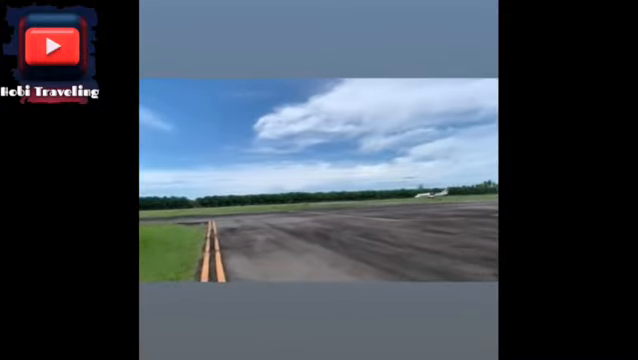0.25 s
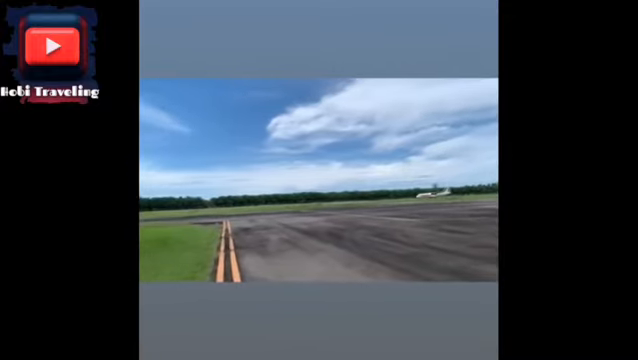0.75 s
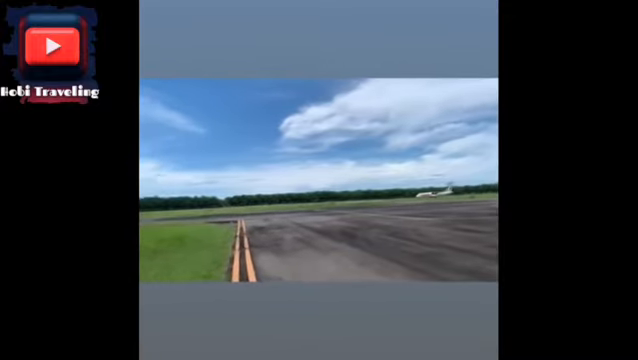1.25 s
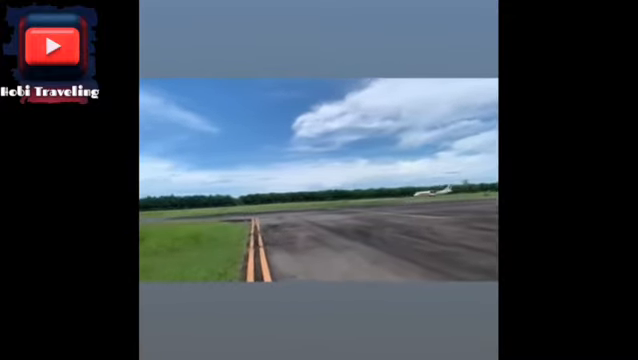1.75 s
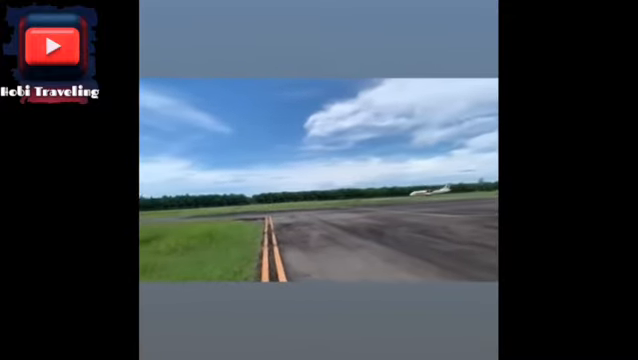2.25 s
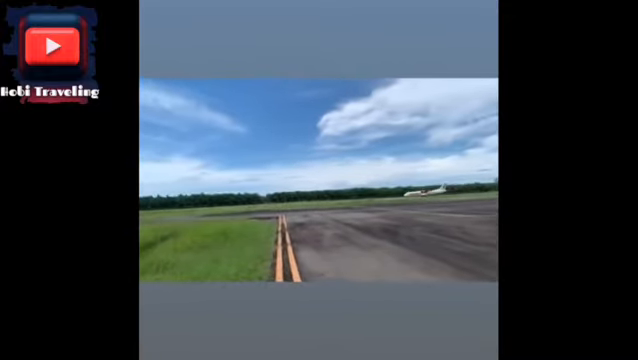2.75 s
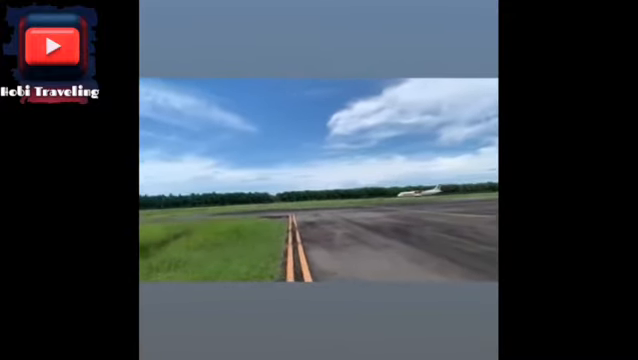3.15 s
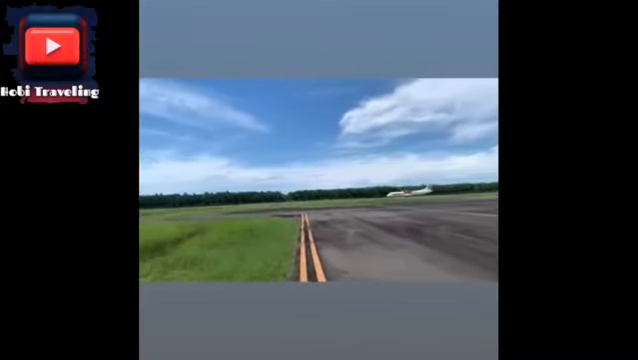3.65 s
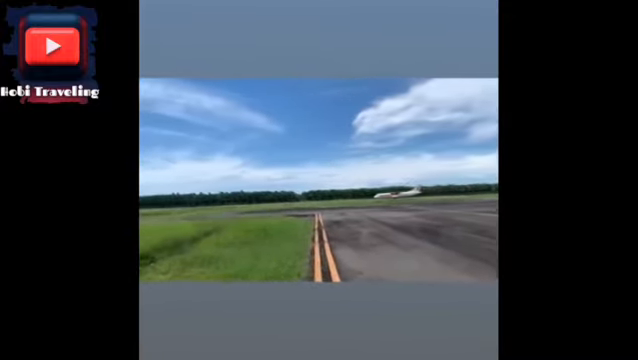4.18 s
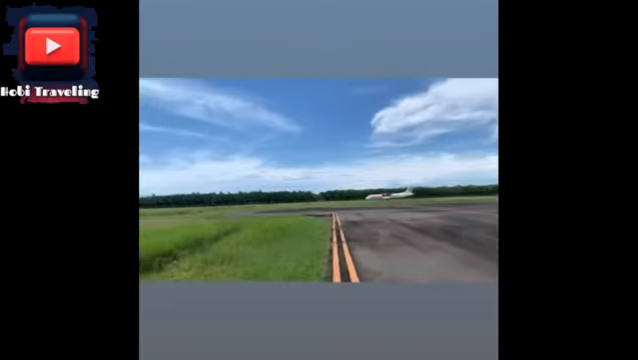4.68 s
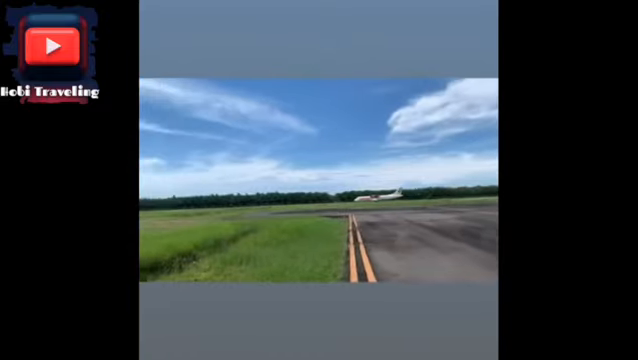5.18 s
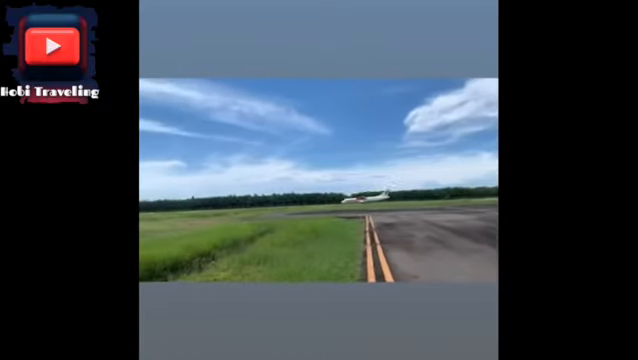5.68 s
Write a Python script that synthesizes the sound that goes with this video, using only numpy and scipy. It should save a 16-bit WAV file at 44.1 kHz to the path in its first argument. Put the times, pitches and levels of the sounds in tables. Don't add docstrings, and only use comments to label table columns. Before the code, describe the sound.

Far turboprop aircraft, continuous and gradually louder, heard by a hand-held stereo pair in an open airfield. First comes a muted low drone and rumble with breathy roar, then stronger puffs of hiss. From the middle the propeller tone becomes fuller and throbs unevenly as the two propellers drift in and out of step. The last second is brightest, with a hissy whistle, still right of centre.

```python
import sys
import numpy as np
from scipy import signal
from scipy.fft import rfft, irfft
from scipy.io import wavfile
from scipy.ndimage import uniform_filter1d, map_coordinates

SR = 44100
rng = np.random.default_rng(int(sys.argv[2]) if len(sys.argv) > 2 else 0)


def materialize(psi):
    bounded = np.clip(np.atleast_2d(psi).T, -1, 1)
    quanta = np.round(bounded * 32767).astype(np.int16)
    wavfile.write(sys.argv[1], SR, quanta)


def natural_amplitude(level_db):
    exponent = np.asarray(level_db, float) / 20
    return 10 ** exponent


N = 261072
TIME_S = np.arange(N) / SR

# t/s, length/s, gain/dB
AIR_GUSTS = [(.7, 0.1, 5), (.9, 0.073, 5), (1.13, 0.034, -2.5), (1.4, 0.14, 2), (1.56, 0.013, 2.5),
             (1.7, .07, -5), (2.28, 0.08, 7), (2.49, 0.08, 9), (2.95, 0.021, 2), (3.11, 0.076, 10.5),
             (3.33, 0.026, 4.5), (3.54, 0.02, 4.5), (3.7, 0.08, 2), (4.05, 0.21, 2), (4.27, .09, 9),
             (4.55, 0.032, 6), (4.72, 0.051, 6.5), (4.42, 0.036, 0.5), (4.93, 0.054, 2.5),
             (5.17, 0.059, 2.5), (5.31, 0.027, 6), (5.51, 0.038, 5), (5.62, 0.13, 3), (5.81, 0.055, 3.5)]
INTAKES_FACE_S, INTAKES_SWING_S = 4.76, 0.42


def rms_one(x):
    return x / np.sqrt(np.mean(x ** 2) + 1e-20)


def in_time(rows):
    s, *columns = np.transpose(rows)
    return [np.interp(TIME_S, s, c) for c in columns]


def at_hz(points, hz, axis=1):
    points = np.array(points)
    return np.interp(np.log(hz), np.log(points[:, 0]), points[:, axis])


def step(hz, from_hz, to_hz):
    return np.clip(np.log(hz / from_hz) / np.log(to_hz / from_hz), 0, 1)


def rise(at_s, over_s):
    return 0.5 + 0.5 * np.tanh((TIME_S - at_s) / over_s)


def swells(rows):
    t = np.arange(0, N, 64) / SR
    s, length, *columns = np.transpose(rows)
    bells = np.exp(-0.5 * ((t[:, None] - s) / length) ** 2)
    return [np.interp(TIME_S, t, bells @ c) for c in columns]


def drift(rate_hz):
    every = 40
    r = np.exp(-2 * every * np.pi * rate_hz / SR)
    white = rng.standard_normal(N // every + 2002)
    slow = signal.lfilter([1], [1, -2 * r, r * r], white)[2000:]
    return np.interp(np.arange(N) / every, np.arange(len(slow)), rms_one(slow))


def banded_noise(colour, edges, lift_db, flutter_db, patchy_db):
    # f/Hz, share/1
    direct_share = [(30, 0.8), (120, 0.97), (400, 0.96), (600, 0.65), (1500, 0.66), (2300, 0.6),
                    (3200, 0.7), (4500, .55), (5400, 0.6), (7000, 0.6), (9000, 0)]
    out, power, flutter = 0, 0, drift(12.0)
    white = rng.standard_normal((2, 3, N))
    for k, (low, high) in enumerate(zip(edges, edges[1:])):
        hz = np.sqrt(low * high)
        band_pass = signal.butter(2, [low, high], "band", fs=SR, output="sos")
        band = signal.sosfilt(band_pass, white[k % 2])
        share = np.clip(at_hz(direct_share, hz), 0, 1)
        colour_db = at_hz(colour, hz)
        gain = natural_amplitude(colour_db + lift_db(hz) + flutter_db * flutter + patchy_db * drift(9.6))
        out = out + gain * band * np.sqrt([[share], [1 - share], [1 - share]])
        power += natural_amplitude(colour_db) ** 2 * (high - low) * 2 / SR
    return out / np.sqrt(power)


def propellers():
    # t/s, f/Hz
    blade_rate = [(0, 123.2), (1.0, 123.9), (2.2, 124.5), (3.2, 124.1), (3.8, 123.3), (4.5, 122.7),
                  (5.2, 121.7), (5.92, 121.4)]
    # t/s, level/dB
    tone_level = [(0, -39), (.3, -33), (.7, -33), (1.5, -32.5), (2.1, -31), (2.9, -30.5), (3.15, -26),
                  (3.3, -31.5), (3.75, -26.5), (3.95, -24), (4.25, -21), (4.8, -20), (5.1, -23),
                  (5.45, -21.5), (5.6, -29), (5.78, -20), (5.86, -21), (5.92, -25.5)]
    # t/s, length/s, loss on tone/dB, loss on octave/dB
    cancellations = [(.43, 0.076, 6.5, 3), (.82, 0.028, 2.5, -10), (1.33, 0.046, 7, -8),
                     (1.85, 0.066, 8.5, 3), (2.32, 0.056, 6, -13), (2.77, 0.032, 2, 10),
                     (3.06, 0.019, 10.5, 12), (3.5, 0.17, -5, 5.5), (4.2, 0.13, -1, 8.5),
                     (4.4, 0.05, 0.5, -3), (4.62, 0.068, -0.5, 8), (4.71, 0.026, 5.5, 8),
                     (5.03, 0.041, 4, -2), (5.55, 0.097, -2, 11), (5.75, 0.097, 11, 7.5)]
    turns = 2 * np.pi * np.cumsum(in_time(blade_rate)[0]) / SR
    tone_loss_db, octave_loss_db = swells(cancellations)
    in_plane = rise(2.937, 0.33)
    tone_db = in_time(tone_level)[0] - tone_loss_db + 0.7 * drift(6.0)
    octave_db = -58.5 + 28.5 * in_plane - octave_loss_db + 1.0 * drift(5.0)
    third_db = -71.5 + 16.5 * in_plane + 2.0 * drift(6.3)
    tone = 0
    for order, level_db in enumerate([tone_db, octave_db, third_db], 1):
        phase = order * turns + 0.31 * drift(2.2)
        tone = tone + np.sqrt(2) * natural_amplitude(level_db) * np.sin(phase)
    return tone, turns


def exhaust():
    # f/Hz, level per Hz/dB
    rumble_colour = [(20, -23), (35, -29), (55, -8.5), (80, -6), (110, 6), (150, 5), (200, -4),
                     (270, -13.5), (350, -14), (450, -27.5), (600, -25.5)]
    # t/s, length/s, gain/dB
    rumble_surges = [
        (.45, 0.21, 0.5),
        (1.52, 0.037, 3.5),
        (2.7, 0.14, 1.5),
        (3.75, 0.034, 3),
        (5.58, 0.023, 4.5),
        (5.8, 0.17, -1),
    ]
    level_db = -43.5 + 2 * TIME_S + swells(rumble_surges)[0]
    deep_db = 2 * np.maximum(TIME_S - 3.2, 0)
    upper_db = -1 + swells([(3.72, 0.78, 7.5)])[0]

    def lift_db(hz):
        return step(hz, 144, 240) * upper_db + (1 - step(hz, 78, 110)) * deep_db

    edges = np.geomspace(18, 700, 17)
    return natural_amplitude(level_db + 5.0) * banded_noise(rumble_colour, edges, lift_db, flutter_db=0.4, patchy_db=2.15)


def turbines(turns):
    # t/s, level/dB
    roar_level = [(0.0, -44), (1.32, -42), (1.37, -40.5), (2.04, -39.5), (2.06, -37.5), (2.62, -40),
                  (2.64, -40.5), (3.13, -38), (3.46, -40.5), (3.56, -39.5), (3.81, -41.5), (3.99, -36),
                  (4.29, -34), (4.32, -35.5), (5.16, -38), (5.31, -34), (5.77, -35.5), (5.92, -36.5)]
    # f/Hz, level per Hz/dB
    roar_colour = [(350, -12), (500, -7.5), (700, 1), (1000, -1.5), (1600, 1), (2300, 0), (2800, 2),
                   (3700, 1.5), (4500, -1), (5900, -7.5), (6800, -5), (8200, -10), (9300, -5), (10400, -15)]
    level_db, gust_db = in_time(roar_level)[0], swells(AIR_GUSTS)[0]
    upper_db = -7 + 0.43 * gust_db + 1.5 * rise(3.95, 0.065)
    hiss_db = -2.5 + TIME_S + gust_db
    bright_db = 1 * rise(INTAKES_FACE_S, INTAKES_SWING_S)
    chop_db = 1.5 * np.sin(turns)

    def lift_db(hz):
        upper = step(hz, 1430, 3200) * (upper_db + 4.5)
        hiss = step(hz, 4200, 7800) * (hiss_db - upper_db - 6.5 + chop_db)
        return upper + hiss + step(hz, 7000, 8400) * bright_db

    edges = np.geomspace(330, 11500, 22)
    roar = natural_amplitude(level_db + 7.5) * banded_noise(roar_colour, edges, lift_db, flutter_db=0.45, patchy_db=1.88)
    air_cut_hz = 9500
    return signal.sosfilt(signal.butter(8, air_cut_hz, fs=SR, output="sos"), roar)


def compressor():
    band_pass = signal.butter(3, [8000, 8950], "band", fs=SR, output="sos")
    band = signal.sosfilt(band_pass, rng.standard_normal(N))
    level_db = -61.5 + 22.5 * rise(INTAKES_FACE_S, INTAKES_SWING_S)
    level_db = level_db + 1.3 * swells(AIR_GUSTS)[0] + 2.0 * drift(14.0)
    return natural_amplitude(level_db) * rms_one(band)


def scene():
    # t/s, lag/samples
    bearing = [(0, 4.3), (.4, 4.8), (.7, 6.0), (1.2, 6.3), (3.7, 6.2), (3.95, 4.4), (4.7, 4.4), (5.1, 3.9),
               (5.92, 3.3)]
    tone, turns = propellers()
    direct, left, right = exhaust() + turbines(turns)
    direct = direct + tone + compressor()
    late = map_coordinates(direct, [np.arange(N) - in_time(bearing)[0]], order=3, mode="nearest")
    return np.array([late + left, direct + right])


def case_and_ports(dry):
    # f/Hz, width/Hz, level/dB
    case_dips = [(2286, 130, -5), (3038, 165, -15), (3975, 90, -3.5), (4470, 46, -15.5), (5170, 130, -7),
                 (5564, 33, -37.5)]
    # f/Hz, level/dB, extra lag/rad
    left_port = [(25, -2.5, .2), (50, 8.7, .2), (127, -1.74, 0.21), (300, -0.4, 0.067), (468, 1, 0.01),
                 (650, -7, 0.8), (970, -3, 0.012), (1440, -2.5, 0.01), (2320, -1.5, 0.015),
                 (3420, -1, 0.0084), (4040, -4, 0.0093), (4420, -7.5, 0.01), (6010, -3, 0.01),
                 (6370, 3, 0.011), (8000, 1, 0.0075)]
    hz = np.arange(1, N // 2 + 2) * SR / N
    case_db = sum(db / (1 + (2 * (hz - dip_hz) / width) ** 2) for dip_hz, width, db in case_dips)
    port = natural_amplitude(at_hz(left_port, hz)) * np.exp(-1j * at_hz(left_port, hz, axis=2))
    return irfft(rfft(dry) * natural_amplitude(case_db) * [port, np.ones_like(port)], N)


def gated(left, right):
    # f/Hz, mid level/dB, side level/dB
    thresholds = [(700, -16, -13), (2300, -8, -10), (2600, -8, -11), (2850, -2.6, -11), (3100, -4.8, -11),
                  (3500, -5.5, -11), (3800, -4.6, -11), (4200, -8, -11), (5170, -2.4, -11),
                  (5700, -6.5, -9), (6300, -9, -6), (7600, -9, -6), (8270, -9, 3.5), (8960, -9, 30),
                  (9700, -9, 8), (10300, -2, -1), (11000, 4, -1)]
    band_lines = [32, 40, 48, 56, 64, 72, 80, 88, 96, 108, 120, 132, 144, 160, 176, 196, 216, 240, 264, 292,
                  320, 352, 384, 416, 448, 464, 480, 496, 512, 544]
    frame, lead = 2048, 842
    window = ("kaiser", 9)
    pair = np.pad([left + right, left - right], ((0, 0), (lead, 0))) / 2
    hz, _, bins = signal.stft(pair, SR, window=window, nperseg=frame)
    loud = np.mean(abs(bins[:, 320:420]) ** 2, axis=(0, 1))
    gate_db = -10 - 4.5 * rng.exponential(1, loud.shape)
    for low, high in zip(band_lines, band_lines[1:]):
        line_power = abs(bins[:, low:high]) ** 2
        power = uniform_filter1d(np.mean(line_power, axis=1), size=2)
        limit_db = np.array([[at_hz(thresholds, hz[low], axis=1)], [at_hz(thresholds, hz[low], axis=2)]])
        limit_db = limit_db + 1.0 * rng.standard_normal(power.shape)
        kept = (power > power[::-1] * natural_amplitude(2 * limit_db)) & (power > loud * natural_amplitude(2 * gate_db))
        floor_db = -7 + 2 * rng.standard_normal(power.shape[1])
        strong = line_power > power.max(axis=0) * natural_amplitude(2 * floor_db)
        bins[:, low:high] *= kept[:, None] * strong
    mid, side = signal.istft(bins, SR, window=window, nperseg=frame)[1][:, lead:lead + N]
    return np.array([mid + side, mid - side])


def roll_off(x):
    return signal.sosfilt(signal.butter(12, 11260, fs=SR, output="sos"), x)


def record(dry):
    self_noise = natural_amplitude(-60) * rng.standard_normal((2, N))
    left, right = case_and_ports(dry) + self_noise
    return roll_off(gated(left, right))


dry = scene()
out = record(dry)
materialize(out)
```